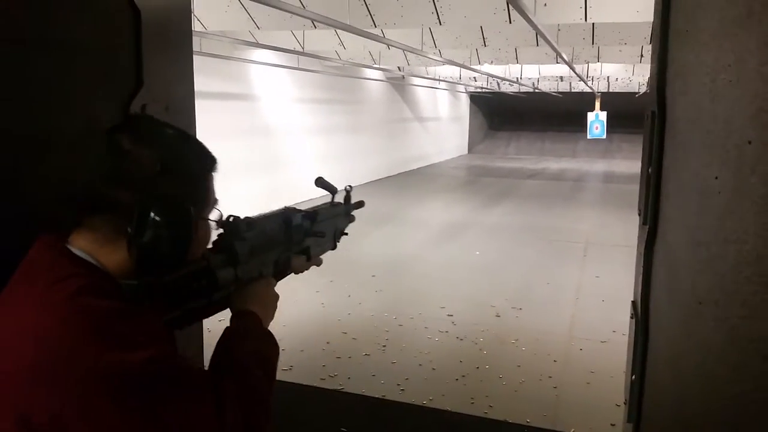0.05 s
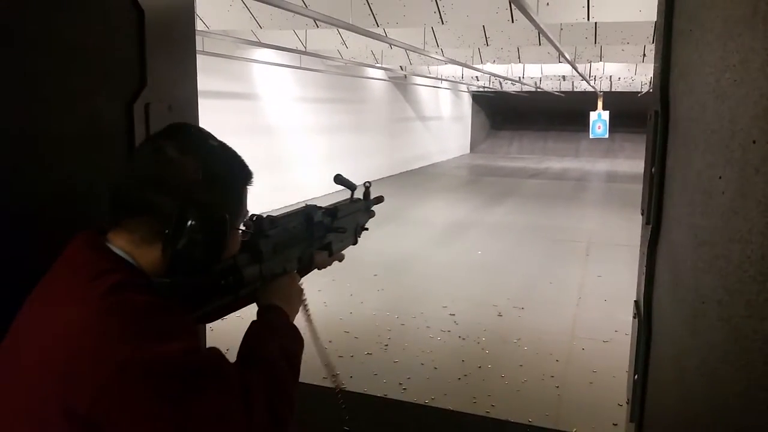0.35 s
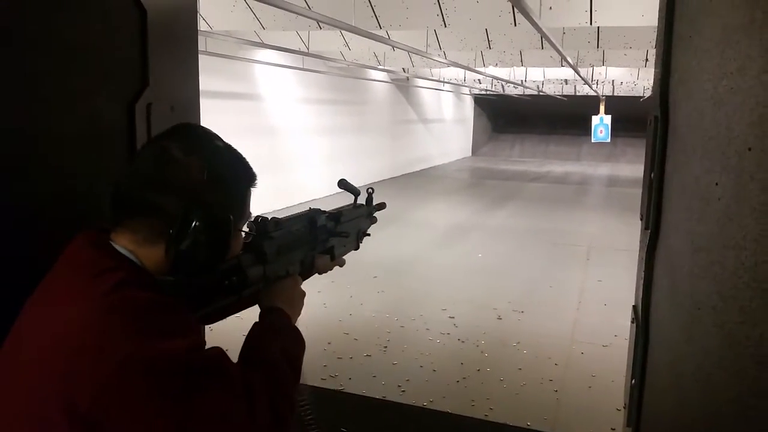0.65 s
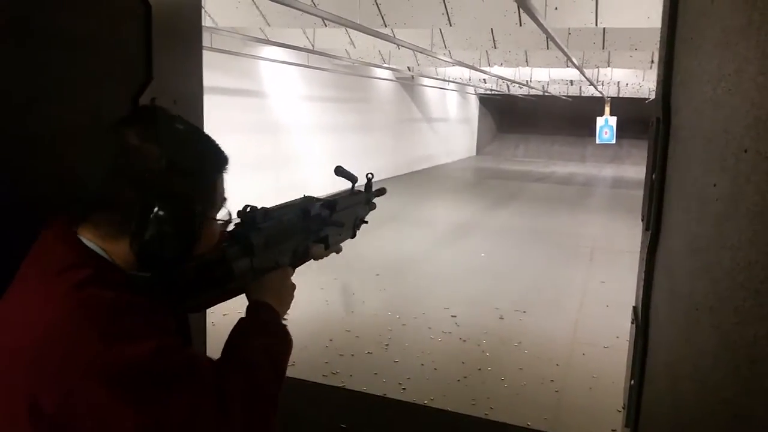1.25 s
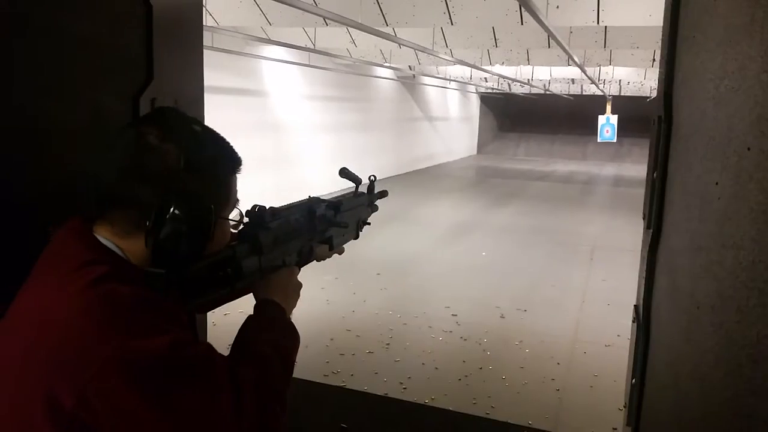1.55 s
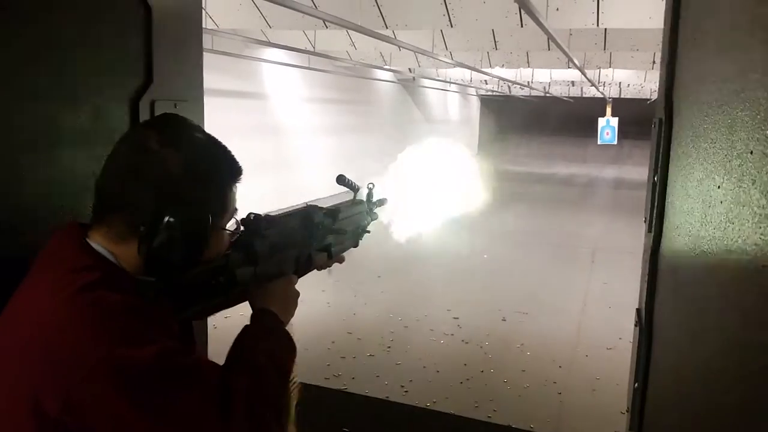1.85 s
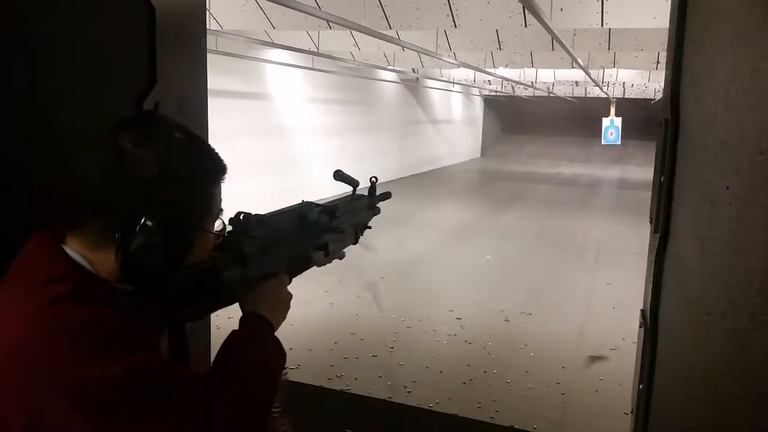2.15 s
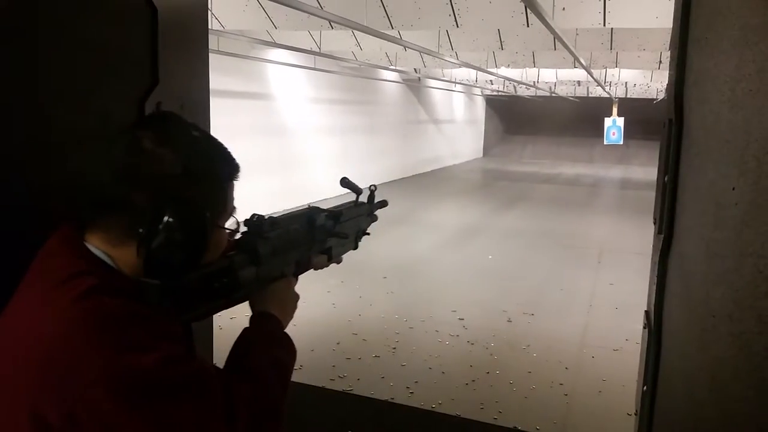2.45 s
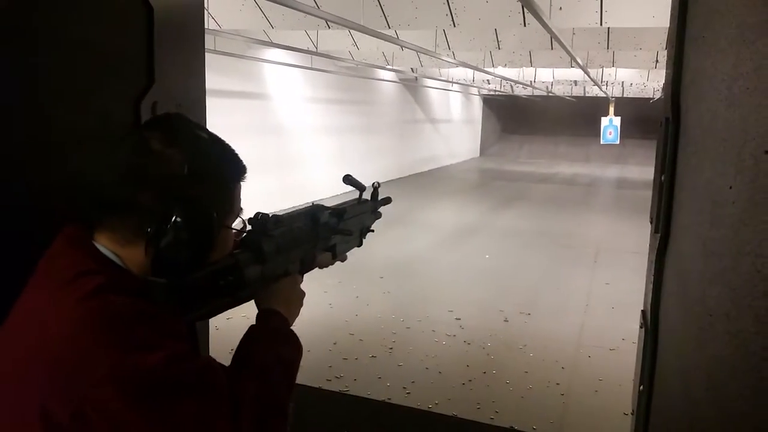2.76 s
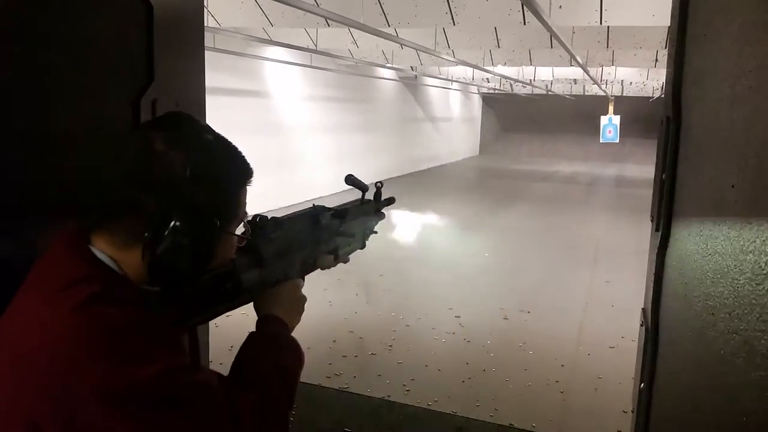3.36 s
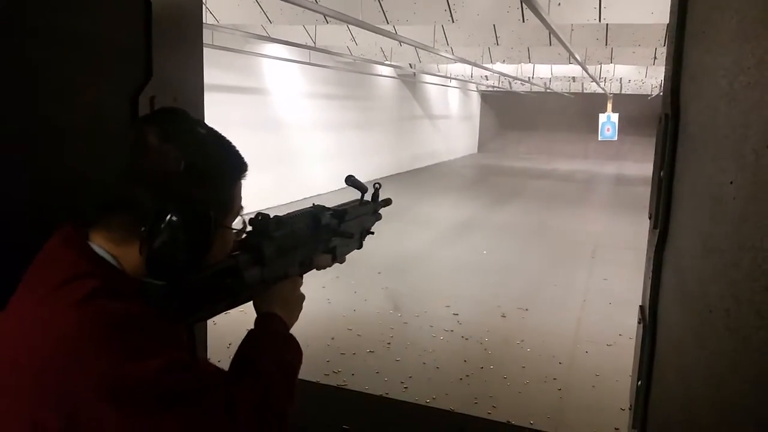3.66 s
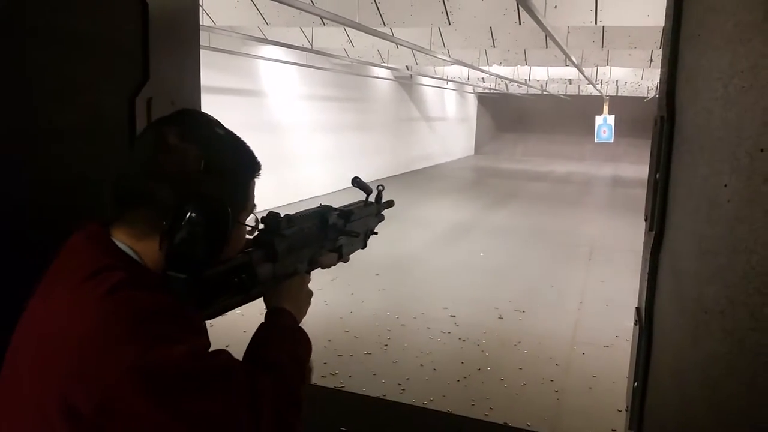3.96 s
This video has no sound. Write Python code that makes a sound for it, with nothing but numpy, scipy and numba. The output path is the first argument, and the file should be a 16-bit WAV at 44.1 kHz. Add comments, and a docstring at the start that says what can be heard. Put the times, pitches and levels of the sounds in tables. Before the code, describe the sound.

Close, slightly distorted machine gun fire fills an indoor range. After soft handling clicks over rumbling ventilation come a short burst, a longer one, a light tinkle of brass, then the longest burst, each with a booming echo.

```python
"""In a booth of an indoor range, a belt-fed machine gun fires three bursts over the ventilation's rumble.
The bolt slides home before each burst. Every shot is an impulse that excites the booth's resonances and
the concrete hall's reverberation; the bullet's strike returns late from the backstop. Spent brass tinkles
in free vibration. The overloaded recorder ducks and saturates, so the boom swells only between blasts."""
import sys
import numpy as np
from scipy import signal
from scipy.fft import rfft, irfft
from scipy.io import wavfile
from scipy.ndimage import uniform_filter1d
from numba import njit

SR = 44100
rng = np.random.default_rng(int(sys.argv[2]) if len(sys.argv) > 2 else 0)


def persist_wave(psi):
    """Save psi, clipped to +-1, as 16-bit WAV."""
    counts = np.round(np.clip(psi, -1, 1) * 32767).astype(np.int16)
    wavfile.write(sys.argv[1], SR, np.atleast_2d(counts).T)


N = 176400

# rounds fired (t/s, shot level/dB, backstop strike level/dB)
ROUNDS = [(0.965, -4, -11), (1.0454, -6.5, 3), (1.1234, -2.5, 0.5), (1.781, -4.5, 0), (1.8627, -3.5, 2),
          (1.94, -4.5, -8), (2.0214, -4.5, 7), (2.0991, -5, 8.5), (2.1776, -2, 4.5), (2.9264, -13, -4),
          (3.0061, -10, -7), (3.0852, -3.5, -7), (3.1612, -4, 6), (3.2388, 1, 11.5), (3.3172, -2.5, 3),
          (3.3944, -1, 13), (3.4724, -2, 6), (3.5493, -2, -1), (3.6255, -1.5, 3)]
# muzzle blast (f/Hz, spectral level/dB, left T60/s, balance/dB); balance is always left minus right
BLAST_SPECTRUM = [(40, -36, 0.23, 7), (153, -14, 0.56, 38.5), (410, -2, 0.42, 11.5), (766, 2, 0.41, 7),
                  (1840, 3.5, 0.32, 6), (5000, 1.5, 0.16, 9), (8750, -5, 0.26, 11.5), (11000, 1.5, 0.14, 5),
                  (15700, 3, 0.21, 1)]
def muzzle_blasts(hold_s=0.0062, rise_s=0.00062, backstop_delay_s=0.1106):
    """Energy addition: a brief plateau, its decay in the booth and the delayed strike sum in power."""
    released = impulses(ROUNDS, hold_s)
    plateau_power = np.maximum(np.cumsum(impulses(ROUNDS) ** 2 - released ** 2), 0)
    strikes = impulses([(s, db) for s, _, db in ROUNDS], backstop_delay_s)
    backstop = undb(-24.5) * die_away(strikes, t60=0.23)
    out = 0
    for hz, band in bands(noise(BLAST_SPECTRUM)):
        t60 = across(hz, BLAST_SPECTRUM, column=2)
        booth = np.array([die_away(released, t60), die_away(released, t60 * 0.72)])
        out = out + band * soften(np.sqrt(plateau_power + booth ** 2 + backstop ** 2), rise_s)
    return undb(41.5) * out


# crack at the muzzle (f/Hz, spectral level/dB, balance/dB)
CRACK_SPECTRUM = [(1000, -25, 10), (4000, -18.5, 12), (8650, -21, 6), (12000, 0, 5), (15500, 6.5, 1.5)]
def muzzle_cracks():
    """A steep pressure front is rich in treble: each shot opens with a bright crack."""
    envelope = soften(die_away(impulses(ROUNDS), t60=0.083), rise_s=0.0005)
    return undb(46) * noise(CRACK_SPECTRUM) * envelope


# resonances of booth and lane (f/Hz, width/octaves, level/dB, peak delay/s, balance/dB)
BOOTH_MODES = [(119, .9, 17.5, 0.068, -6), (316, 0.55, 23.5, .062, -3), (564, 0.34, 22, 0.072, 4.5),
               (740, 0.34, 22.5, .037, 0), (1510, 0.91, 27, .035, 4)]
def booth_resonances(swell_s=0.016, scatter_s=0.0028, scatter_db=1.5):
    """Cavity resonance: the enclosed air swells behind each shot, a little differently every time."""
    t, out = clock(), 0
    for hz, octaves, db, delay, balance in BOOTH_MODES:
        chance = rng.standard_normal((len(ROUNDS), 2))
        hits = impulses([(s + scatter_s * late, level + scatter_db * louder)
                         for (s, level, _), (late, louder) in zip(ROUNDS, chance)])
        swell = np.exp(-((t[:SR // 4] - delay) / swell_s) ** 2)
        out = out + undb(db) * resonance(hz, octaves, balance) * signal.fftconvolve(hits, swell)[:N]
    return out


# early reflections from near walls and ceiling (f/Hz, spectral level/dB, balance/dB)
THUD_SPECTRUM = [(50, -25, -4), (138, -1, -4), (234, -10, -5), (330, 5, 16), (460, 0, -11), (588, -0.5, 20),
                 (630, 0, 3), (870, 6, -1), (1250, -6, 11), (2150, -9, 12), (3940, -54, 12),
                 (15000, -63, 6)]
# reverberant field (f/Hz, spectral level/dB, T60/s, balance/dB)
BOOM_SPECTRUM = [(30, -59, 2.5, 4), (58.4, -14, 1.8, 18), (103.5, -4.5, 2, -1.5), (151, -3, 4.45, -3),
                 (197, -2.5, 2.81, -2.5), (238, -1.5, 2.73, 0), (415, 0.5, 1.96, -3), (676, -7.5, 2.63, -2),
                 (1240, -11, 1.6, 3.5), (2130, -12.5, 1.54, 5), (3110, -19.5, 1.56, 4),
                 (5900, -20.5, 0.86, 16), (8600, -24.5, 0.83, 9), (14800, -17.5, 0.52, -2)]
# resonances of the hall (f/Hz, width/octaves, level/dB, T60/s, balance/dB)
HALL_MODES = [(246, 0.52, 19, 2.18, -5), (2130, 0.31, 9.5, 1.37, 2.5)]
def hall_reverberation(thud_delay_s=0.014):
    """Convolution: every shot draws the same impulse response, a thud, then a darkening, ringing boom."""
    t = clock()
    age = np.maximum(t - thud_delay_s, 0)
    thud = undb(36) * noise(THUD_SPECTRUM) * build(age, rise_s=0.014) * fade(age, t60=0.22)
    boom = sum(band * fade(t, across(hz, BOOM_SPECTRUM, column=2))
               for hz, band in bands(noise(BOOM_SPECTRUM)))
    modes = sum(undb(db) * resonance(hz, octaves, balance) * fade(t, t60)
                for hz, octaves, db, t60, balance in HALL_MODES)
    response = thud + undb(21) * boom * build(t, rise_s=0.016) + modes * build(t, rise_s=0.2)
    return signal.fftconvolve(impulses(ROUNDS)[None], response, axes=1)[:, :N]


# forward runs of the bolt (t/s, duration/s, starting level/dB)
BOLT_TRAVEL = [(0.898, 0.004, -25), (0.924, 0.053, -9.5), (1.745, 0.051, -10.5), (2.899, 0.03, -11)]
# sliding steel (f/Hz, spectral level/dB, balance/dB)
SCRAPE_SPECTRUM = [(200, -25, 0), (900, 2, -7), (2000, 5.5, 6), (3500, 0, 7), (5770, -8.5, 17),
                   (8740, -10, 14), (12000, 4.5, 6), (16500, 8.5, -15)]
def bolt_scrape(swell_db_per_s=166):
    """Sliding friction: the bolt scrapes louder as it gathers speed, then the sound dies away."""
    t, envelope = clock(), 0
    for s, length, db in BOLT_TRAVEL:
        swell = (t >= s) * undb(db + swell_db_per_s * np.clip(t - s, 0, length))
        envelope = envelope + swell * fade(np.maximum(t - s - length, 0), t60=0.12)
    return noise(SCRAPE_SPECTRUM) * envelope


# knocks as the gun is handled (t/s, level/dB, clatter T60/s)
HANDLING = [(0.387, -26, 0.21), (0.505, -34.5, 0.36)]
# clatter of the knocks (f/Hz, spectral level/dB, balance/dB)
CLATTER_SPECTRUM = [(200, -25, 0), (900, -7, -10), (1910, 6, 3), (3730, -10, 3), (5600, -8, 18),
                    (7900, -26, 13), (11800, -8.5, 3), (15000, -14, -8)]
# modes of the gun's receiver (f/Hz, T60/s, level at first knock/dB, level at second/dB)
RECEIVER_MODES = [(5020, 0.39, -5, -10), (5560, 0.24, -14, -7), (6000, .13, -5, -2), (4650, .3, -16, -7),
                  (6800, 0.2, -18, -8), (11720, .14, -14, -22), (1624, 0.091, -2, 2)]
def receiver_knocks(balance_db=16):
    """Impact excitation: steel meets steel with a snap and a clatter, and the receiver's modes ring."""
    t, ringing = clock(), 0
    for k, (s, db, _) in enumerate(HANDLING):
        modes = [(hz, levels[k], t60) for hz, t60, *levels in RECEIVER_MODES]
        ringing = ringing + undb(db - 5) * ring(t - s, modes, flutter_share=0.12, flutter_hz=70)
    clatter = noise(CLATTER_SPECTRUM) * sum(undb(db) * fade(t - s, t60) for s, db, t60 in HANDLING)
    snap = resonance(hz=5650, octaves=0.15, balance=balance_db) * die_away(impulses(HANDLING), t60=0.045)
    return clatter + undb(0.5) * snap + ringing * undb([[balance_db / 2], [-balance_db / 2]])


# cases landing (t/s, level/dB)
CASE_IMPACTS = [(1.535, -39), (1.552, -25), (1.586, -33), (2.41, -13), (2.475, -21), (2.708, -25),
                (2.7361, -10), (2.755, -13), (2.785, -18), (2.83, -24)]
# modes of a case (f/Hz, level/dB, T60/s)
CASE_MODES = [(10840, -20, .33), (14550, -9, .2), (14880, -6, .25), (15500, 4, 0.32), (15800, 0, 0.23)]
# tick of brass (f/Hz, spectral level/dB, balance/dB)
TICK_SPECTRUM = [(2000, -35, 3), (8000, -22, -1), (11500, -10, 5), (14000, -2, -5), (15500, -8, -10)]
def spent_cases():
    """Shell vibration: brass cases tick on the concrete and ring, fluttering as they tumble."""
    ringing = sum(undb(db) * ring(clock() - s, CASE_MODES, flutter_share=0.94, flutter_hz=318)
                  for s, db in CASE_IMPACTS)
    return ringing + undb(-1) * die_away(impulses(CASE_IMPACTS), t60=0.05) * noise(TICK_SPECTRUM)


# belt links landing and bouncing (t/s, level/dB, T60 multiplier)
LINK_IMPACTS = [(0, -34.5, 1.5), (.156, -43, 1), (.232, -51, .6), (1.67, -46, 1), (2.58, -34, 1),
                (2.652, -21.5, .75)]
# modes of a link (f/Hz, level/dB, T60/s)
LINK_MODES = [(6540, -11, 0.23), (8489, -15, 0.2), (10050, -9, 0.24), (11760, -2, 0.33),
              (13700, 12.5, 0.42)]
def belt_links(rise_s=0.003):
    """Damped free vibration: a link rings at the same frequencies each time it meets the floor."""
    t, out = clock(), 0
    for s, db, stretch in LINK_IMPACTS:
        modes = [(hz, level, t60 * stretch) for hz, level, t60 in LINK_MODES]
        onset = np.clip((t - s) / rise_s, 0, 1)
        out = out + undb(db) * onset * ring(t - s, modes, flutter_share=0.04, flutter_hz=40)
    return out


def belt_rustle(peak_s=0.724, swell_s=0.04):
    """Contact noise: the belt shifts in one faint, bright swell."""
    return undb(-45.5) * noise(TICK_SPECTRUM) * np.exp(-((clock() - peak_s) / swell_s) ** 2)


# ventilation (f/Hz, spectral level/dB, balance/dB)
VENT_SPECTRUM = [(25, -18, -4), (53, -18.5, 3), (87, 0.5, -3.5), (149, -5, -4.5), (225, -10.5, -2.5),
                 (325, -17, -3.5), (594, -31, -1), (1200, -37.5, 2), (2210, -42, 3.5), (3400, -57, 4.5),
                 (5270, -58, 16.5), (8100, -75.5, 18), (14900, -63, -7)]
def ventilation():
    """Stationary noise: a steady rumble with most of its power in the bass."""
    return undb(-13) * noise(VENT_SPECTRUM)


# likeness of the sound at the two microphones (f/Hz, coherence 0-1)
COHERENCE = [(60, 1), (220, 0.96), (400, 0.72), (700, 0.45), (1300, 0), (15000, 0)]
def noise(table):
    """Spatial coherence: stereo noise of rms 1, shaped by a table; long waves reach both sides alike."""
    hz = np.fft.rfftfreq(N, 1 / SR)
    mid, side = rfft(rng.standard_normal((2, N)))
    alike, sign = across(hz, COHERENCE, column=1), np.array([[1], [-1]])
    pair = mid * np.sqrt(1 + alike) + sign * side * np.sqrt(1 - alike)
    colour = undb(across(hz, table, column=1) + sign * across(hz, table, column=-1) / 2)
    low_cut = np.minimum(hz / table[0][0], 1)
    x = irfft(pair * colour * low_cut, N)
    return x / x.std()


def resonance(hz, octaves, balance):
    """Narrow-band noise, 12 dB down at `octaves` either side of its centre."""
    return noise([(hz * 2 ** (k * octaves), -12 * k * k, balance) for k in np.arange(-3, 3.5, 0.5)])


def ring(age, modes, flutter_share, flutter_hz):
    """Modal superposition: damped sines, phased apart at each microphone and partly fluttering."""
    out, knots = np.zeros((2, N)), np.arange(4000)
    for hz, db, t60 in modes:
        phasors = rng.standard_normal((2, len(knots))) + 1j * rng.standard_normal((2, len(knots)))
        live = np.flatnonzero((age >= 0) & (age < 2 * t60))
        t = age[live]
        flutter = np.array([np.interp(t * flutter_hz, knots, side) for side in phasors])
        amplitude = np.sqrt(1 - flutter_share) + np.sqrt(flutter_share) * flutter
        carrier = np.exp(2j * np.pi * (hz * t + rng.random((2, 1))))
        out[:, live] += undb(db) * fade(t, t60) * (amplitude * carrier).imag
    return out


def bands(x):
    """Filter bank of overlapping bands; yields (centre f/Hz, band)."""
    centres = np.geomspace(50, 16000, 14)
    log_hz, spectrum = np.log(np.fft.rfftfreq(N, 1 / SR) + 1), rfft(x)
    for hz, pick in zip(centres, np.eye(len(centres))):
        yield hz, irfft(spectrum * np.interp(log_hz, np.log(centres), pick), N)


def across(hz, table, column):
    """A table's column, interpolated in log frequency."""
    table = np.array(table, float)
    return np.interp(np.log(hz + 1e-3), np.log(table[:, 0]), table[:, column])


def impulses(events, delay=0):
    """One impulse for each (t/s, level/dB)."""
    x = np.zeros(N)
    for s, db, *_ in events:
        x[int(np.clip((s + delay) * SR, 0, N - 1))] += undb(db)
    return x


def die_away(hits, t60):
    """Envelope of impulses whose energies add and decay."""
    retained = np.exp(-2 * np.log(1000) / (t60 * SR))
    return np.sqrt(signal.lfilter([1], [1, -retained], hits ** 2 + 1e-18))


def soften(envelope, rise_s):
    """First-order lag that rounds an onset."""
    pole = np.exp(-1 / (rise_s * SR))
    return signal.lfilter([1 - pole], [1, -pole], envelope)


def build(age, rise_s):
    """Exponential approach to full amplitude."""
    return 1 - np.exp(-age / rise_s)


def fade(age, t60):
    """Exponential decay from age zero."""
    return (age >= 0) * np.exp(-np.log(1000) * np.maximum(age, 0) / t60)


def undb(db):
    """Decibels to gain."""
    return 10 ** (np.asarray(db) / 20)


def clock():
    """Time of every sample."""
    return np.arange(N) / SR


@njit
def follow(x, attack_s, release_s):
    """Envelope detection: rectify, then smooth with separate rise and fall times."""
    out, level = np.empty(len(x)), 0.
    for i in range(len(x)):
        lag_s = attack_s if abs(x[i]) > level else release_s
        level += (abs(x[i]) - level) / (lag_s * SR)
        out[i] = level
    return out


def scene():
    """Superposition: the pressures of gunfire, moving metal and ventilation add."""
    gunfire = muzzle_cracks() + muzzle_blasts() + booth_resonances() + hall_reverberation()
    metal = receiver_knocks() + bolt_scrape() + belt_rustle() + spent_cases() + belt_links()
    return gunfire + metal + ventilation()


def record(dry, duck_db=12, duck_above_db=12, ahead_s=0.037, limit_db=1.5, ratio=5.1, band_hz=(39, 15900)):
    """Compression: the gain ducks just ahead of loud sound; each channel is limited, then saturates."""
    loud = follow(dry[0], attack_s=1 / SR, release_s=1.) > undb(duck_above_db)
    ahead = np.interp(clock() + ahead_s, clock(), loud * 1.)
    x = dry * undb(-duck_db * uniform_filter1d(ahead, int(0.025 * SR)))  # 25 ms fades
    sensed = np.hypot(x, 0.45 * np.diff(x, prepend=0))  # the slope term limits treble hardest
    level = np.array([follow(side, attack_s=0.00013, release_s=0.0058) for side in sensed])
    x = x * np.minimum(undb(limit_db) / (level + 1e-9), 1) ** (1 - 1 / ratio)
    x = 0.87 * np.tanh(x * undb(2.5))
    x = signal.sosfilt(signal.butter(1, band_hz[0], "high", fs=SR, output="sos"), x)
    return signal.sosfilt(signal.ellip(10, 0.1, 60, band_hz[1], fs=SR, output="sos"), x)


dry = scene()
out = record(dry)
persist_wave(out)
```